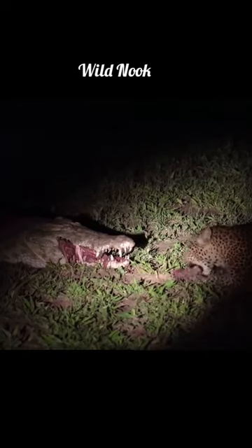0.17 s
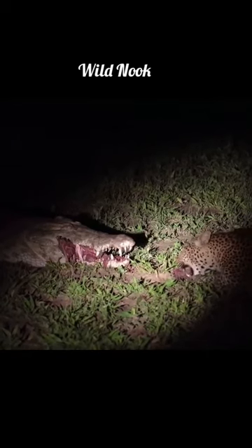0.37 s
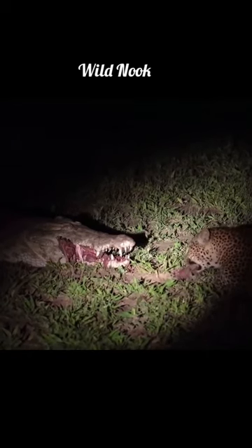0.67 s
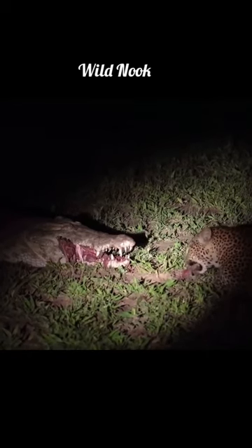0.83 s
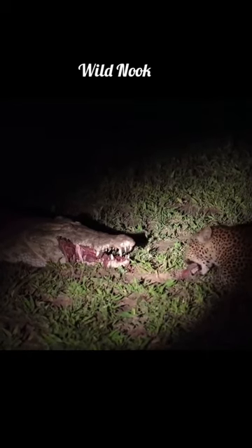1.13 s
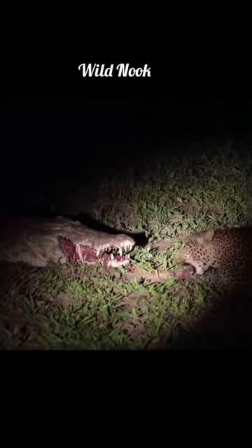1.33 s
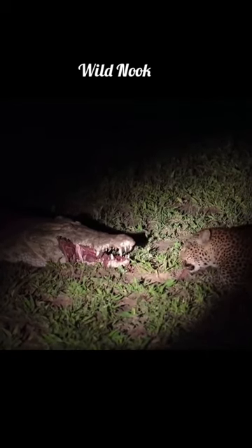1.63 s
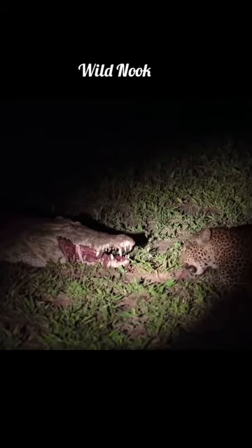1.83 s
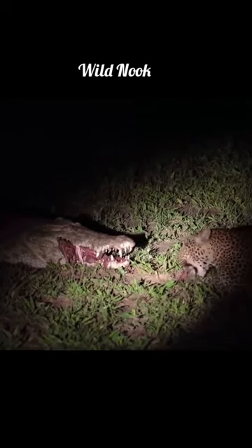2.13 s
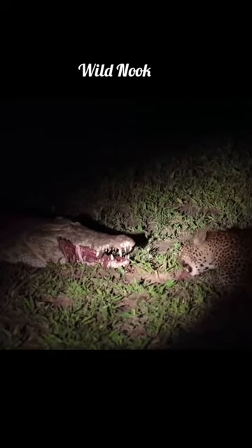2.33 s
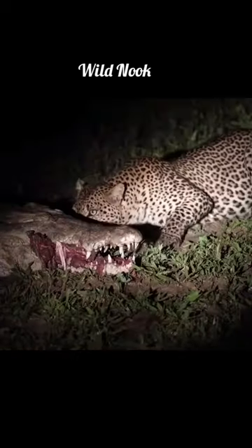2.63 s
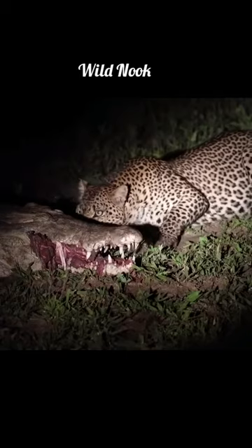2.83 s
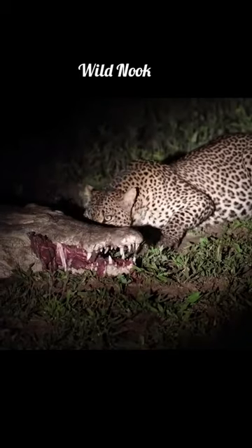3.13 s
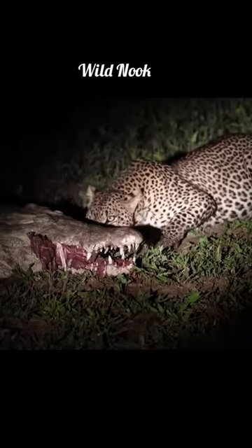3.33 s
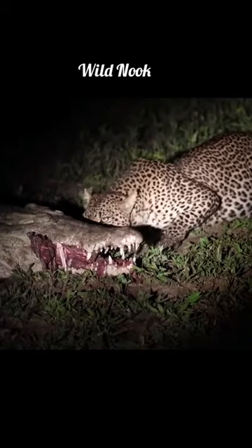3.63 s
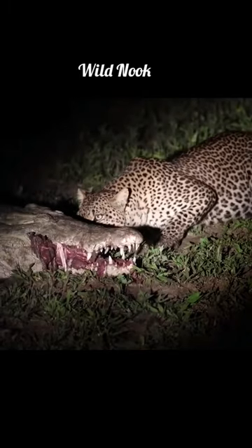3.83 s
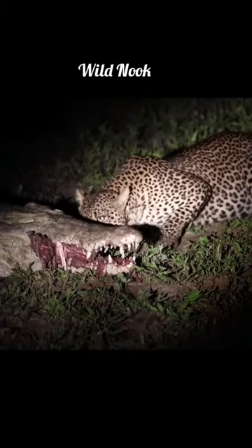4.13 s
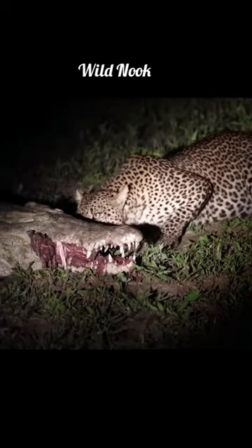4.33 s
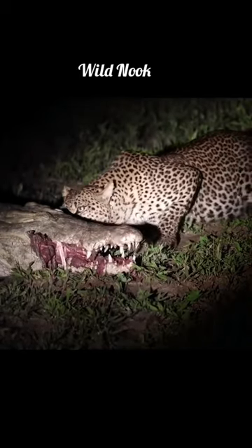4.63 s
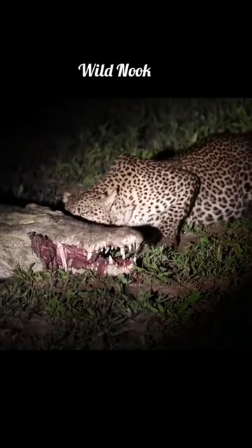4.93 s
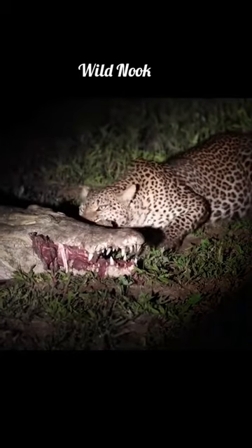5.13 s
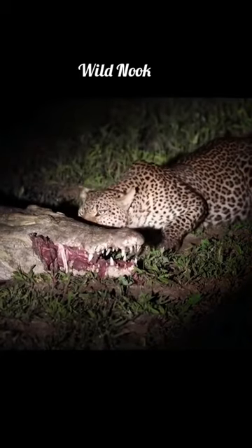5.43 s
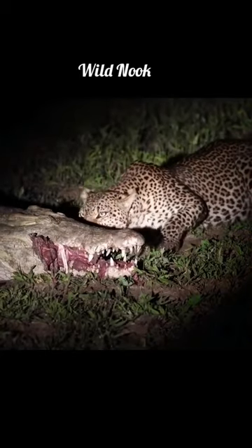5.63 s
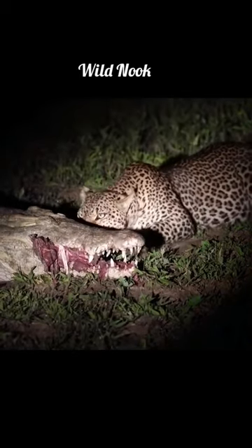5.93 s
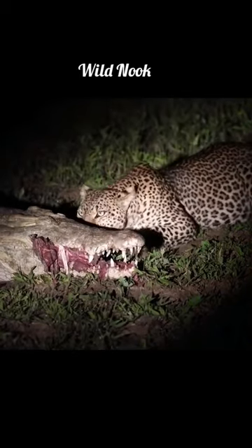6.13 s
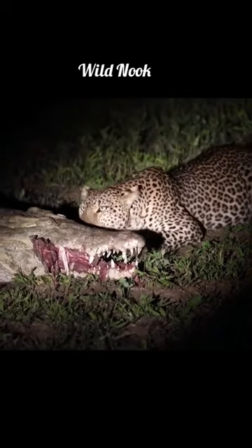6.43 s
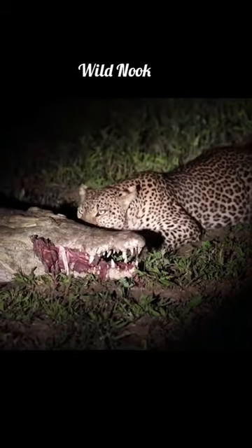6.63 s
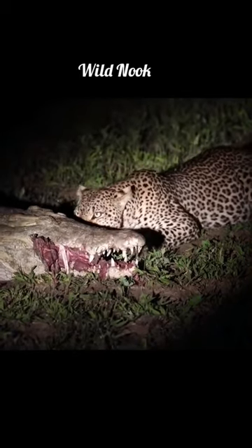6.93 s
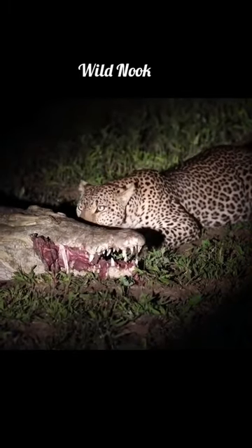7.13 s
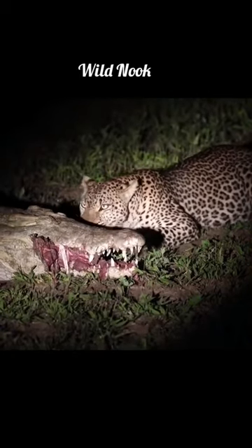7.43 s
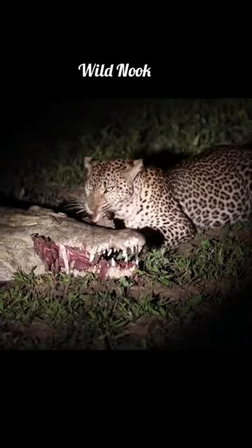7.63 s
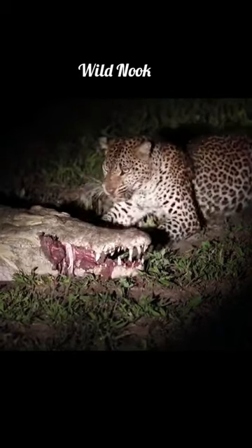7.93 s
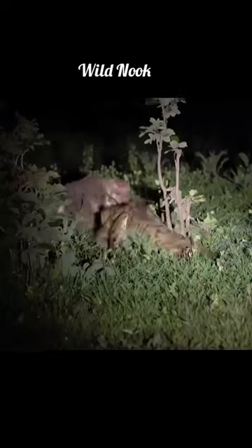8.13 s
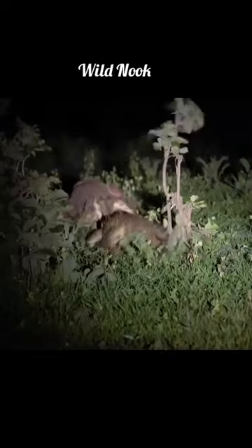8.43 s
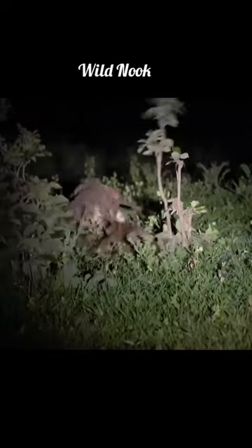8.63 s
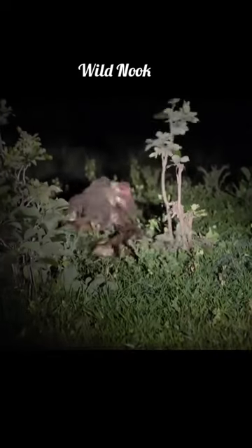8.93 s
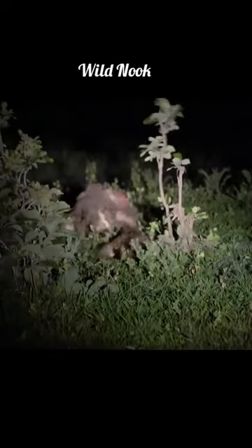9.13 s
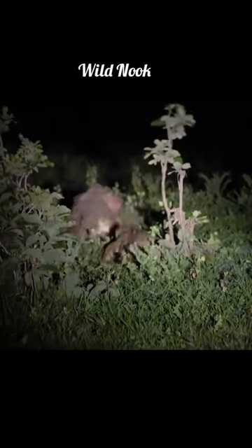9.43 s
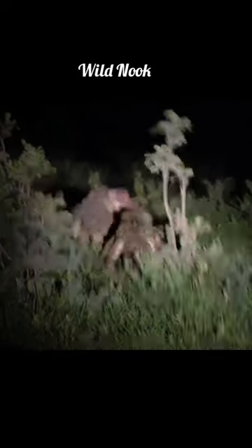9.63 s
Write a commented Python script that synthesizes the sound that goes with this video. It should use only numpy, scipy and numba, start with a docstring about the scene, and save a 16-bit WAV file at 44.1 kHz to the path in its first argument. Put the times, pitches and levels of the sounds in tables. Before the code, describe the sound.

A leopard growls again and again in low, throaty rumbles, centred in front of the microphone, starting after a few seconds of crackling stalks and faint high bat squeaks. Occasional dull crunches of biting fall among the growls. All around is night grassland: a bright insect hiss, a nearby pulsing cricket slightly right, and frogs pipping on the left. The growls stop, and something brushes through the grass, snapping stems.

```python
"""A hiss of far insects fills the night grassland; close by, a bush cricket scrapes its wings in bursts
and small frogs pip to the left of the microphone. Grass stirs, bites crunch and stalks snap, a field
cricket chirrs and a bat flies over with diving calls. Then a leopard growls over its carcass:
slow flaps of its vocal folds ring chest and throat."""
import sys
import numpy as np
from scipy import signal
from scipy.fft import rfft, irfft, next_fast_len
from scipy.io import wavfile
from numba import njit

SR = 44100
rng = np.random.default_rng(int(sys.argv[2]) if len(sys.argv) > 2 else 0)


def master_out(mix):
    """Clip the mix to full scale and print it as 16-bit PCM to the path in sys.argv[1]."""
    frames = np.transpose(np.atleast_2d(mix))
    ceiling = np.clip(frames, -1, 1)
    pcm = np.round(ceiling * 32767).astype(np.int16)
    wavfile.write(sys.argv[1], SR, pcm)


N = 430857
T = np.arange(N) / SR


def undb(db):
    """Decibels to gain."""
    return 10 ** (np.asarray(db) / 20)


def unit(x):
    """Scale to rms 1."""
    return x / np.sqrt(np.mean(x ** 2) + 1e-18)


def noise(channels=2):
    """Unrelated white noises."""
    return rng.standard_normal((channels, N))


def curve(rows):
    """Join (seconds, value) rows by straight lines."""
    return np.interp(T, *np.transpose(rows))


def walk(rate):
    """Random drift with a spread near 1 and `rate` new values a second."""
    knots = np.arange(0, T[-1] + 1, 1 / rate)
    return 1.4 * np.interp(T, knots, rng.standard_normal(len(knots)))


def bouts(rows, rise_s, fall_s):
    """Gain of a singer that starts and stops, from (start, end, dB) rows."""
    return sum(undb(db) * np.clip((T - start) / rise_s + .5, 0, 1)
               * np.clip((end - T) / fall_s + .5, 0, 1) for start, end, db in rows)


def whistle(hz):
    """A sine that follows a pitch track."""
    return np.sin(2 * np.pi * (np.cumsum(hz) / SR + rng.random()))


def add(out, at, sound):
    """Mix a short sound in at a time in seconds."""
    start = int(at * SR)
    lo, hi = max(start, 0), min(start + sound.shape[-1], N)
    if hi > lo:
        out[..., lo:hi] += sound[..., lo - start:hi - start]


def shape(x, response):
    """Filter by a response given as a function of frequency."""
    size = next_fast_len(N + SR // 2, True)
    hz = np.fft.rfftfreq(size, 1 / SR) + 1e-3
    return irfft(rfft(x, size) * response(hz), size)[..., :N]


def colour(x, points):
    """Filter by a spectrum of (Hz, dB) points."""
    hz, db = np.transpose(points)
    return shape(x, lambda f: undb(np.interp(np.log(f), np.log(hz), db)))


def ring(x, modes):
    """Drive damped (Hz, width Hz, dB) resonances; as in a tube, neighbours swing opposite ways."""
    return shape(x, lambda f: sum((-1) ** k * undb(db) / (1 + 1j * (f * f - hz * hz) / (f * width))
                                  for k, (hz, width, db) in enumerate(modes)))


@njit
def resonate(x, hz, width):
    """One damped resonance whose centre moves."""
    y, band, low = np.empty(len(x)), 0., 0.
    for i in range(len(x)):
        g, damping = np.tan(np.pi * hz[i] / SR), width / hz[i]
        v = (band + g * (x[i] - low)) / (1 + g * (g + damping))
        band, low = 2 * v - band, low + 2 * g * v
        y[i] = damping * v
    return y


def spread(pair, alike_hz):
    """Mid and side: left and right share the bass and part above `alike_hz`."""
    side = shape(pair[1], lambda f: 0.99 * f ** 2 / (f ** 2 + alike_hz ** 2))
    return pair[0] + np.array([side, -side])


def in_bush(x, wet_db, t60, pan_db, lag_ms):
    """A caller reaches the microphone directly and off leaves and ground; positive pan is left."""
    t = np.arange(SR // 2) / SR
    leaves = rng.standard_normal((2, len(t))) * undb(-60 * t / t60)
    leaves /= np.sqrt(np.sum(leaves ** 2, axis=1, keepdims=True))
    direct = np.array([x, shape(x, lambda f: np.exp(-2j * np.pi * f * lag_ms / 1000))])
    echoes = undb(wet_db) * signal.fftconvolve(x[None], leaves, axes=1)[:, :N]
    return (direct + echoes) * undb([[pan_db / 2], [-pan_db / 2]]) / np.hypot(1, undb(wet_db))


# Distant insects, all around. Each row: time in seconds, level in dB.
HISS_LEVELS = [(0, -35), (.55, -38.5), (.72, -38.5), (1.5, -32.5), (1.75, -36.5), (9.77, -37)]
# A higher, buzzing insect. Each row: start and end in seconds, level in dB.
BUZZ_BOUTS = [(.7, 1.17, -41), (1.35, 1.66, -40.5), (2.1, 2.36, -45), (2.6, 2.75, -41), (4.15, 4.4, -49),
              (5.75, 6, -41), (6.35, 6.6, -48), (7.2, 7.6, -47.5), (8.4, 8.7, -40.5), (9.2, 9.55, -43)]
# Their spectra. Each row: frequency in Hz, relative level in dB.
HISS_SPECTRUM = [(3000, -40), (3700, -13), (4150, -7), (4450, -2), (4900, -9.5), (5400, -2.5), (5850, 2),
                 (6300, -0.5), (6750, 2.5), (7150, 3.5), (7500, -1), (8000, -9.5), (8400, -15), (8900, -59)]
BUZZ_SPECTRUM = [(5000, -20.5), (6200, -2), (7000, 7), (7500, 4), (8100, -6.5), (8700, -60.5)]


def far_insects():
    """Distant wings merge into a flickering hiss, with swells of buzz and one faint field cricket."""
    hiss = unit(colour(noise(), HISS_SPECTRUM)) * undb(curve(HISS_LEVELS) + walk(140))
    buzz = unit(colour(noise(), BUZZ_SPECTRUM)) * undb(1.4 * walk(120))
    buzz *= bouts(BUZZ_BOUTS, rise_s=0.097, fall_s=0.069)
    faint_cricket = whistle(4156 + 12 * walk(60)) * undb(-59.5 + 2 * walk(4.9))
    return hiss + buzz + faint_cricket


# The open air. Each row: frequency in Hz, relative level in dB.
AIR_SPECTRUM = [(25, -46), (60, -19), (130, -9), (300, -3.5), (600, 1.5), (1000, 2), (1600, -3),
                (2100, 10.5), (3100, -10), (7000, -18), (9200, -32), (10600, 2), (13500, 7), (15500, -7.5)]


def night_air():
    """Still air: a soft, wide bed of noise."""
    return unit(spread(colour(noise(), AIR_SPECTRUM), alike_hz=390)) * undb(-51.5 + 0.85 * walk(2.64))


# Grass around the microphone. Each row: time in seconds, level in dB.
GRASS_LEVELS = [(0, -49), (.45, -54.5), (.7, -49.5), (1.3, -46.5), (1.9, -54.5), (3.2, -56), (3.6, -53),
                (4.9, -54), (5.7, -57), (8.2, -53.5), (8.8, -46), (9.77, -44)]
# Each row: frequency in Hz, relative level in dB.
GRASS_SPECTRUM = [(25, -46), (50, -30), (130, -20), (280, -8), (700, -5), (1300, -1), (2000, 1.5),
                  (3200, -2.5), (6000, -1.5), (8000, -64), (9200, -17.5), (11000, -0.5), (15000, -18)]


def grass(sway_db=1.1, grain_db=2.0):
    """Blades brush and tick as the animals shift their weight."""
    grains = undb(sway_db * walk(22) + grain_db * walk(220))
    blades = colour(noise() * grains, GRASS_SPECTRUM)
    return unit(spread(blades, alike_hz=700)) * undb(curve(GRASS_LEVELS))


# The near bush cricket's runs. Each row: start, end, burst period and burst length, all in seconds.
TRILL_RUNS = [(0.016, 0.21, .42, .29), (0.634, 1.585, .33, .295), (1.722, 2.766, .416, .28),
              (2.889, 5.212, .419, .3), (5.581, 5.783, .42, .29), (6.017, 7.866, .398, .258),
              (8.094, 8.22, .42, .29), (8.341, 9.8, .421, .305)]


def trill_bursts(warm_db=-36, cold_db=-5, warm_up_s=2.37):
    """Evenly spaced (start, end, dB) bursts; the cricket starts softly and warms up."""
    return [(at, min(at + length, end), warm_db + cold_db * max(1 - at / warm_up_s, 0))
            for start, end, period, length in TRILL_RUNS for at in np.arange(start, end, period)]


# Steady ringing tones near 6 kHz in the trill. Each row: frequency and width in Hz, relative level in dB.
ECHO_TONES = [(6030, 24, 0), (6100, 22, 0), (6168, 18, -1.5), (6226, 18, -1), (6292, 22, 0.5),
              (6360, 16, -8), (6432, 22, 1), (6548, 18, -3.5), (6635, 22, -2.5)]
# The scrape of the cricket's file. Each row: frequency in Hz, relative level in dB.
SCRAPE_SPECTRUM = [(4800, -26.5), (5700, 3.5), (6200, 3), (6650, 6.5), (7000, 5), (7600, -2), (8600, -72),
                   (9400, -23), (10600, -8), (13000, -48), (15000, -19)]


def bush_cricket(stroke_hz=54, tiring_hz_per_s=21, high_hz=6800, low_hz=5800, grit_db=-3, scrape_db=-10):
    """Each wing stroke is a falling scrape that rings in nearby echoes; strokes slow through a burst."""
    bursts = trill_bursts()
    starts = np.array(bursts)[:, 0]
    age_s = T - starts[np.maximum(np.searchsorted(starts, T) - 1, 0)]
    rate_hz = (stroke_hz - tiring_hz_per_s * age_s) * (1 + 0.07 * walk(30))
    stroke_phase = np.cumsum(rate_hz) / SR % 1
    pressure = .25 + np.sin(np.pi * stroke_phase) ** 2
    sweep = unit(pressure * whistle(high_hz + (low_hz - high_hz) * stroke_phase + 110 * walk(900)))
    # uneven teeth on the file spread the stroke into a wide scrape
    scrape = unit(colour(noise(), SCRAPE_SPECTRUM) * pressure * undb(3.4 * walk(400)))
    strokes = in_bush(sweep, wet_db=-11, t60=0.066, pan_db=-1.0, lag_ms=0.19)
    tones = unit(ring(strokes + undb(grit_db) * scrape, ECHO_TONES))
    trill = undb(-2.5) * (strokes + tones) + undb(scrape_db) * scrape
    return trill * bouts(bursts, rise_s=.036, fall_s=.026) * undb([[1.2], [2.8]])  # a little to the right


# Near frogs, left of the microphone. Each row: time in seconds, pitch in Hz, relative level in dB.
NEAR_PIPS = [(0.045, 2665, -27), (0.219, 2410, -38), (0.274, 2440, -31.5), (0.33, 2530, -37),
             (0.385, 2510, -30), (0.576, 2710, -27), (0.756, 2490, -34), (0.893, 2560, -34),
             (1.046, 2610, -31), (1.16, 2700, -32), (1.308, 2740, -25.5), (1.444, 2570, -31.5),
             (1.5, 2540, -31.0), (1.664, 2550, -29), (1.9, 2750, -25.5), (2.006, 2386, -35),
             (2.074, 2530, -26.5), (2.226, 2510, -31.5), (2.478, 2770, -25.5), (2.58, 2540, -30),
             (2.648, 2520, -31), (3.128, 2530, -29.5), (3.522, 2740, -32), (3.577, 2500, -34),
             (3.725, 2430, -30.5), (4.002, 2760, -31.5), (4.099, 2510, -32), (4.206, 2463, -34.5),
             (4.344, 2465, -37), (4.419, 2734, -33), (4.565, 2500, -34.0), (4.638, 2470, -39),
             (4.928, 2512, -38), (5.036, 2516, -29), (5.374, 2504, -31.5), (5.449, 2564, -32),
             (5.781, 2517, -35), (5.849, 2764, -32), (6.017, 2500, -31.5), (6.145, 2730, -34),
             (7.051, 2550, -31.5), (7.229, 2518, -31), (7.421, 2494, -31.5), (7.592, 2625, -37),
             (7.681, 2480, -32), (7.871, 2516, -35), (8.008, 2710, -37), (8.103, 2525, -25),
             (8.167, 2520, -30), (8.563, 2730, -30), (8.766, 2420, -30.5), (9.04, 2730, -30.5),
             (9.139, 2500, -33.5), (9.245, 2440, -33), (9.382, 2440, -38.5), (9.46, 2770, -31),
             (9.603, 2500, -32.5), (9.678, 2480, -35)]
# The far chorus. Each row: time in seconds, relative level in dB.
CHORUS_LEVELS = [(0, -43), (1.4, -44), (2.2, -44.5), (5.4, -44), (6.5, -49.5), (7.5, -44.5), (9.77, -45.5)]
# The farthest frogs. Each row: frequency in Hz, relative level in dB.
HAZE_SPECTRUM = [(1500, -31.5), (2150, -13.5), (2400, 1), (2550, 4.5), (2780, -2), (2950, -24),
                 (3800, -17.5), (5000, -71)]


def frogs(pip_s=.052, rise_hz=480, near_db=1.5, scatter_db=2.5, haze_db=-3.5, far_pips=210, spots=3):
    """Near frogs give short rising pips; far ones answer from several spots, the farthest as a haze."""
    u = np.linspace(-.5, .5, int(pip_s * SR))
    swell = np.cos(np.pi * u) ** 2
    near, far = np.zeros(N), np.zeros((spots, N))
    for at, hz, db in NEAR_PIPS:
        add(near, at - pip_s / 2, undb(near_db + db) * swell * whistle(hz + rise_hz * u))
    for k, (late, pitch, loud) in enumerate(rng.random((far_pips, 3))):
        pip = swell * whistle(2390 + 230 * pitch + rise_hz * u)
        add(far[k % spots], (k + late) / far_pips * T[-1], undb(scatter_db * (2 * loud - 1)) * pip)
    # the voices are hoarse: an uneven buzz widens each pip
    near *= 1 + 0.43 * walk(400)
    far *= 1 + 0.58 * walk(700)
    near = in_bush(near, wet_db=-10, t60=.05, pan_db=6, lag_ms=.18)
    far = undb(-1.5) * unit(sum(in_bush(spot, wet_db=0, t60=0.06, pan_db=4, lag_ms=0.1) for spot in far))
    haze = unit(colour(noise(), HAZE_SPECTRUM)) * undb(haze_db + 2 * walk(50))
    chorus_gain = undb(curve(CHORUS_LEVELS))
    return colour(near + chorus_gain * far, [(2850, 0), (3050, -13)]) + chorus_gain * haze


# Movement in the tall grass. Each row: middle and length in seconds, level in dB.
BRUSHES = [(0.775, .45, -52), (8.805, 0.14, -41), (9.12, 0.097, -43), (9.472, 0.096, -45)]
# Each row: frequency in Hz, relative level in dB.
SWISH_SPECTRUM = [(20, -70), (150, -20), (330, -3), (800, -6.5), (1500, 5), (2500, -12), (4500, -7),
                  (8000, -1), (15000, -18)]


def swishes():
    """A body brushes through the grass, each swish swelling and dying away."""
    push = sum(undb(db) * np.cos(np.pi * np.clip((T - at) / length, -.5, .5)) ** 2
               for at, length, db in BRUSHES)
    blades = colour(noise() * undb(1.8 * walk(350)), SWISH_SPECTRUM)
    return push * unit(spread(blades, alike_hz=700))


# A field cricket, far off and nearly ahead. Each row: start and end in seconds, level in dB.
CHIRR_BOUTS = [(1.1, 2.58, -46), (3.7, 4.72, -43), (7.4, 8.12, -43.5), (8.3, 8.75, -52),
               (8.75, 9.25, -41.5), (9.25, 9.8, -45)]


def field_cricket(beat_hz=36, pitch_hz=4520):
    """Beating wings chop a high tone into a chirr, heard more as echo than directly."""
    beat = np.maximum(whistle(beat_hz * (1 + 0.13 * walk(25))), 0) * undb(1.9 * walk(35))
    chirr = unit(beat * whistle(pitch_hz + 40 * walk(250)))
    chirr *= bouts(CHIRR_BOUTS, rise_s=0.11, fall_s=0.084)
    return in_bush(chirr, wet_db=1.5, t60=0.12, pan_db=-0.5, lag_ms=0.03)


# The loudest bites and stalks. Each row: time in seconds, then thud, crunch and crackle gains in dB.
LOUD_SNAPS = [(1.115, -49, -41, -46), (1.231, -57, -32.5, -25), (1.485, -52, -55, -50),
              (1.54, -52, -56, -48), (1.614, -60, -37, -18.5), (1.738, -57, -36.5, -22),
              (3.51, -33.5, -41, -49), (3.722, -50, -40, -30), (4.041, -40.5, -34, -48),
              (6.481, -51, -49, -52), (7.609, -50.5, -57, -52), (8.437, -50, -41, -24),
              (8.519, -48, -50, -44), (8.549, -35, -43, -38), (8.628, -51, -37, -22),
              (8.752, -52, -43, -24), (8.768, -52, -42, -26), (9.082, -44, -33, -34), (9.13, -48, -43, -23),
              (9.47, -57, -40, -26), (9.724, -60, -44, -25)]
# Small snaps: thud, crunch and crackle gains in dB relative to the grass.
SMALL_SNAP_OFFSETS = (-8, -2, 1)
# The three parts of a snap. Each row: frequency in Hz, relative level in dB.
THUD_SPECTRUM = [(20, -45), (50, -22), (130, -8), (240, 11), (400, -9), (900, -52)]
CRUNCH_SPECTRUM = [(40, -50), (200, -16), (400, 1), (750, 3), (1200, 1), (2100, -7), (3500, -19)]
CRACKLE_SPECTRUM = [(1000, -16), (2200, 11), (3600, 2.5), (7000, 6), (9200, -12), (11000, -8), (15000, -17)]


def snaps(small_count=24, scatter_db=3, rise_s=0.0019):
    """A bite or a breaking stalk: a dull thud, a crunch and a spray of fine crackle."""
    t = np.arange(SR // 8) / SR
    small = []  # these come by chance as the grass stirs
    for at, size in zip(rng.random(small_count) * T[-1], rng.uniform(-0.92, 1, small_count)):
        grass_db = np.interp(at, *np.transpose(GRASS_LEVELS))
        small.append((at, *(grass_db + np.array(SMALL_SNAP_OFFSETS) + scatter_db * size)))
    parts = [(THUD_SPECTRUM, .008), (CRUNCH_SPECTRUM, .0058), (CRACKLE_SPECTRUM, .0036)]
    out = 0
    for k, (spectrum, decay_s) in enumerate(parts):
        blows = np.zeros(N)
        for at, *levels in LOUD_SNAPS + small:
            add(blows, at, undb(levels[k]) * (1 - np.exp(-t / rise_s)) * np.exp(-t / decay_s))
        fibres = noise() * undb(2.8 * walk(400))  # they give way one by one
        out += unit(spread(colour(fibres, spectrum), alike_hz=900)) * blows
    return out


# A bat overhead. Each row: time in seconds, lowest pitch in Hz, relative level in dB.
BAT_CALLS = [(1.203, 11650, -42), (1.334, 11330, -44), (1.641, 11320, -39), (1.929, 11470, -39.5),
             (2.243, 11570, -35), (2.484, 11470, -35.5), (2.73, 11100, -39.5), (2.939, 11400, -42),
             (6.351, 11640, -51), (7.444, 10950, -45.5)]


def bat(call_s=0.066, sweep_hz=8000, sweep_scatter=.3, roughness=0.3):
    """Each call dives in pitch, some more steeply than others, and is loudest where it levels out."""
    u = np.linspace(-1, .5, int(call_s * SR))
    calls = np.zeros(N)
    swell = np.exp(-(u / 0.35) ** 2) + 0.2 * np.hanning(len(u))
    for (at, hz, db), steep in zip(BAT_CALLS, rng.uniform(-1.1, 1, len(BAT_CALLS))):
        dive_hz = sweep_hz * (1 + sweep_scatter * steep) * np.minimum(u, 0) ** 2
        call = swell * whistle(hz + dive_hz + 200 * walk(903)[:len(u)])
        add(calls, at - call_s * 2 / 3, undb(db) * call)
    return in_bush(calls * (1 + roughness * walk(600)), wet_db=-1, t60=0.066, pan_db=0.5, lag_ms=0.019)


# Under the growls. Each row: time in seconds, level in dB.
HUM_LEVELS = [(2.5, -85), (2.6, -68), (4.8, -71.5), (5.4, -66), (7.6, -69.5), (8.2, -71), (9.0, -78)]
RUMBLE_LEVELS = [(2.54, -100), (2.6, -66), (3.3, -71), (4.9, -60), (5.7, -64), (6.4, -60), (7.2, -67),
                 (7.5, -75), (8.1, -75), (8.2, -78), (9.77, -77)]


def hum_and_rumble():
    """A faint narrow hum and a low rumble come up while the leopard is near."""
    mode = [(918, 63, 0)]
    hum = unit(spread(ring(ring(noise(), mode), mode), alike_hz=900))
    rumble_spectrum = [(15, -18), (40, 8), (90, -5.5), (200, -12), (600, -46), (2000, -80)]
    rumble = unit(colour(noise(channels=1), rumble_spectrum))
    return hum * undb(curve(HUM_LEVELS)) + rumble * undb(curve(RUMBLE_LEVELS) + 2.7 * walk(6))


# The leopard, straight ahead. Each row: start, peak and end in seconds, first and last flaps a second,
# first and last chest tuning as a ratio, first and last rebound in dB, chest and throat levels in dB,
# swell up to the peak and sag after it in dB.
GROWL_GESTURES = [(2.615, 2.78, 2.88, 20.3, 27, 0.95, 0.78, -9, -5, -55, -76, 7.5, 2),
                  (3.096, 3.11, 3.13, 29, 21, 0.91, .9, -10, -6, -62, -71, 0, 6),
                  (3.447, 3.549, 3.806, 18.2, 16, 0.93, 0.91, -1, -1, -62, -71, -2, 1),
                  (3.841, 3.964, 4.24, 26, 19, 0.85, 1.02, -7, -13, -45.5, -62, 9, 14),
                  (4.268, 4.33, 4.59, 21.8, 19.6, 0.93, .95, -5, -9, -53.5, -61.5, 0, 4.5),
                  (4.675, 4.767, 5.015, 23, 20.8, 0.86, 0.76, -9, -7, -46.5, -47, 9, 7.5),
                  (5.144, 5.264, 5.574, 21, 19.4, 0.88, 0.6, -1, -22, -54.5, -51.5, 7, 5),
                  (5.872, 6.126, 6.4, 24.2, 23.9, 1.03, 0.71, 3, 6.5, -58.5, -84, 20, 7),
                  (6.499, 6.561, 6.68, 23.8, 21.2, 0.97, 0.68, -2, -13, -59.5, -73, 7, 3),
                  (6.779, 6.87, 7.24, 26, 20, 0.77, 0.69, -11, -16, -46.5, -49, 13, 4.5),
                  (7.45, 7.831, 8.101, 26, 28, 0.88, 0.94, 0, -7, -53.5, -68.5, 17, 0)]
# Hard pushes. Each row: start and end in seconds, blows per flap.
HARD_PUSHES = [(4.755, 4.84, 3), (6.84, 6.93, 2)]


def vocal_folds(jitter_s=0.0011, rattle_db=-1, scatter_db=1.8):
    """Slack folds slap shut and rebound in between; a hard push splits a flap into a fast rattle."""
    flaps = np.zeros(N)
    for start, _, end, rate0, rate1, _, _, rebound0, rebound1, *_ in GROWL_GESTURES:
        at = start
        while at < end:
            period = 1 / np.interp(at, [start, end], [rate0, rate1])
            rattle = [(at + period * k / blows, rattle_db) for first, last, blows in HARD_PUSHES
                      for k in range(1, blows) if first < at + period * k / blows < last]
            rebound = [(at + period / 2, np.interp(at, [start, end], [rebound0, rebound1]))]
            for when, db in [(at, 0)] + (rattle or rebound):
                late, size = rng.standard_normal(2)
                add(flaps, when + jitter_s * late, undb([db + scatter_db * size]))
            at += period
    return flaps


def effort(release_db_per_s=220):
    """Gains of chest and throat: a growl swells, sags as the air runs out, and is released."""
    chest, throat = np.zeros(N), np.zeros(N)
    for start, peak, end, *_, chest_db, throat_db, swell_db, sag_db in GROWL_GESTURES:
        outside_s = np.maximum(start - T, 0) + np.maximum(T - end, 0)
        push_db = np.interp(T, [start, peak, end], [-swell_db, 0, -sag_db]) - release_db_per_s * outside_s
        chest = np.maximum(chest, undb(chest_db + push_db))
        throat = np.maximum(throat, undb(throat_db + push_db))
    return chest, throat


# The leopard's resonances. Each row: frequency and width in Hz, relative level in dB.
CHEST_MODES = [(68.4, 25.3, 4), (111, 28, 2), (148, 45, -5.5)]
THROAT_MODES = [(183, 57, 2), (222, 30, 3), (275, 60, -6), (428, 40, -13), (510, 61, -34)]
MOUTH_MODES = [(424, 35, -1), (560, 53, -5), (735, 17, -1), (960, 85, -3), (1530, 97, -0.5)]
# A nasal ring in some growls, near 420 or 560 Hz.
# Each row: start and end in seconds, pitch in Hz, gain in dB.
NOSE_TONES = [(3.883, 4.584, 565, -70), (4.74, 4.952, 423, -59.5), (5.195, 5.496, 421, -66),
              (6.878, 7.185, 417, -58.5), (7.96, 8.11, 555, -67)]


def leopard(rasp_db=-10, rasp_s=0.01, voiced_db=-.5, waver=0.071):
    """Each slap rings chest, throat and nose and lets out a rasp of air; the chest's pitch glides."""
    flaps = vocal_folds()
    puffs = signal.lfilter([1], [1, -np.exp(-1 / (rasp_s * SR))], flaps)
    source = unit(flaps) + .1 * unit(puffs * noise(channels=1)[0])
    glide = [point for start, _, end, _, _, first, last, *_ in GROWL_GESTURES
             for point in ((start, first), (end, last))]
    tuning = curve(glide) * np.exp(waver * walk(12))
    chest = sum((-1) ** k * undb(db) * resonate(source, hz * tuning, float(width))
                for k, (hz, width, db) in enumerate(CHEST_MODES))
    chest = unit(colour(chest, [(20, -5), (45, 0), (70, 3.5), (150, 8.5), (400, -46), (1200, -36)]))
    throat = ring(source, THROAT_MODES)
    throat = unit(colour(throat, [(60, -7), (160, 0), (550, -10.5), (1200, -6), (3000, -40)]))
    breath = ring(puffs * noise(), MOUTH_MODES)
    rasp = unit(spread(colour(breath, [(150, -5), (400, -5), (1600, -11), (3500, -30)]), alike_hz=810))
    nose = 0
    for start, end, hz, db in NOSE_TONES:
        mode = [(hz, 52, 0)]
        nose += unit(ring(ring(source, mode), mode)) * bouts([(start, end, db)], rise_s=.071, fall_s=.031)
    chest_gain, throat_gain = effort()
    return chest_gain * chest + throat_gain * (undb(voiced_db) * throat + undb(rasp_db) * rasp) + nose


# The hardest slaps. Each row: time in seconds, gain in dB.
HARD_SLAPS = [(4.798, -33.5), (4.858, -29), (4.901, -37), (6.916, -39.5), (7.02, -38)]
# Each row: frequency in Hz, relative level in dB.
CRACK_SPECTRUM = [(20, -30), (100, -4), (220, 4), (500, 1), (1000, -4), (1500, -4.5), (2200, -17),
                  (3500, -41)]


def throat_cracks(rise_s=0.0012, decay_s=0.0048):
    """The hardest slaps of a growl crack in the throat and burst out over a wide band."""
    t = np.arange(SR // 16) / SR
    blows = np.zeros(N)
    for at, db in HARD_SLAPS:
        add(blows, at, undb(db) * (1 - np.exp(-t / rise_s)) * np.exp(-t / decay_s))
    return blows * unit(spread(colour(noise(), CRACK_SPECTRUM), alike_hz=1210))


def scene():
    """The open bush at night, near and far, from one stereo microphone."""
    surroundings = far_insects() + night_air() + grass() + bush_cricket() + frogs()
    visitors = swishes() + field_cricket() + snaps() + bat()
    return surroundings + visitors + hum_and_rumble() + leopard() + throat_cracks()


def record(dry, top_hz=15400):
    """The microphone cuts the top."""
    return signal.sosfilt(signal.ellip(10, .2, 80, top_hz, fs=SR, output="sos"), dry)


dry = scene()
out = record(dry)
master_out(out)
```